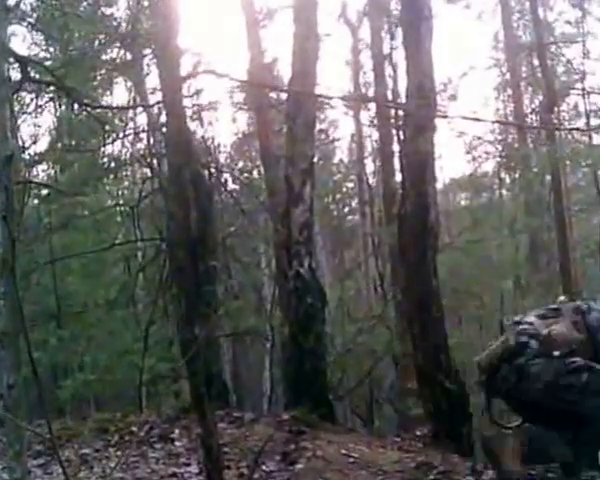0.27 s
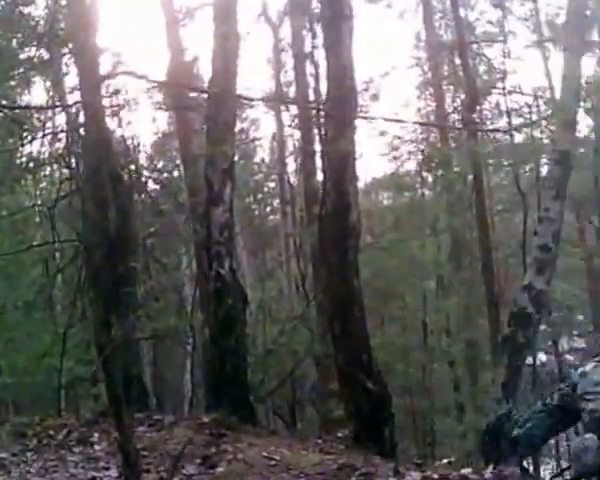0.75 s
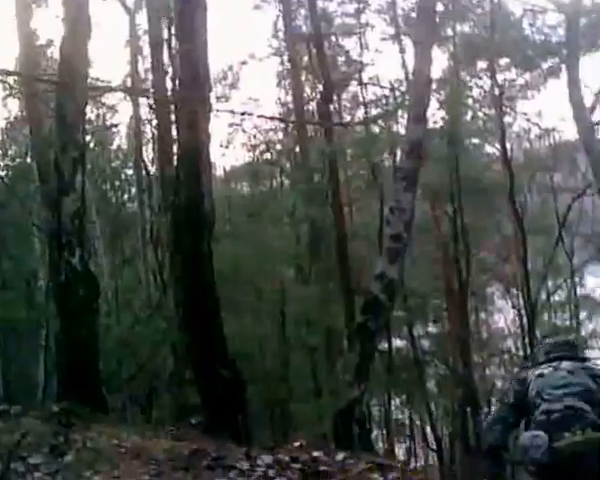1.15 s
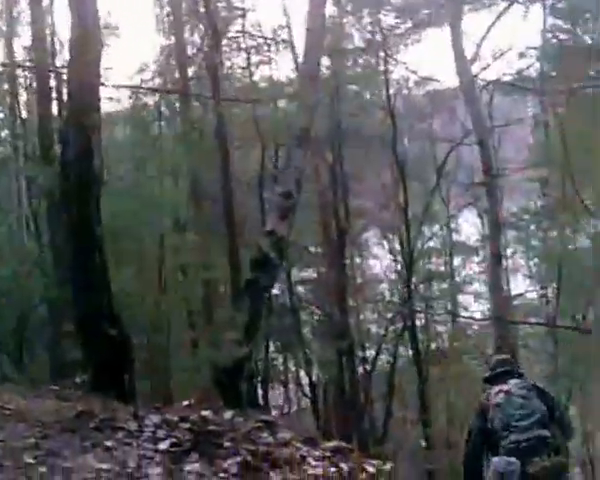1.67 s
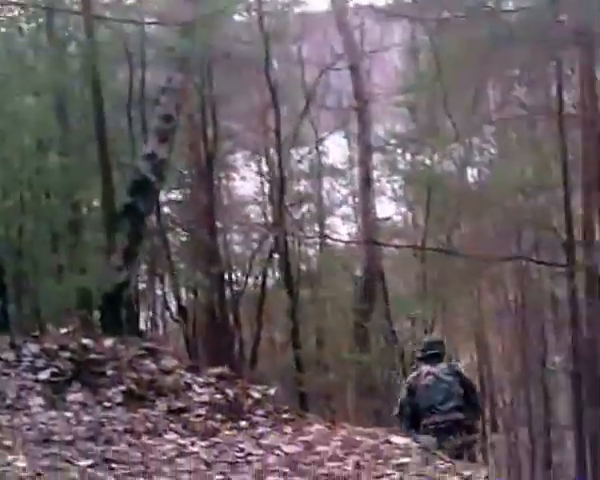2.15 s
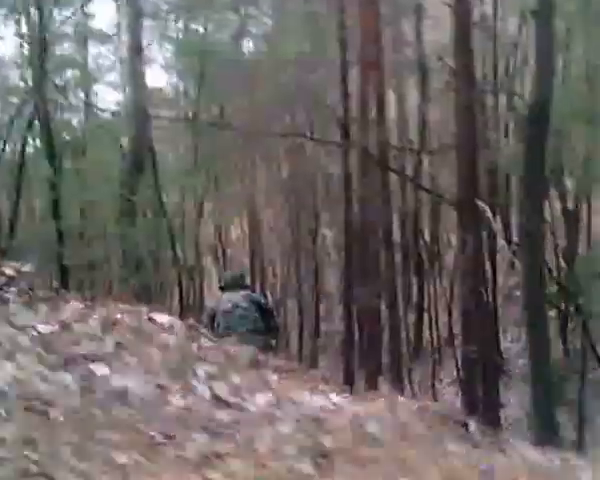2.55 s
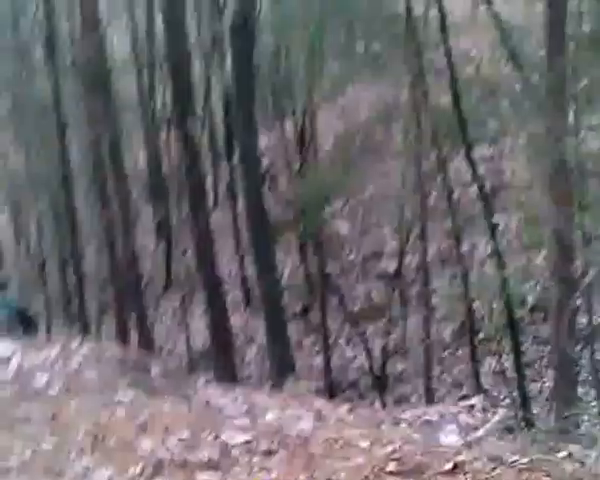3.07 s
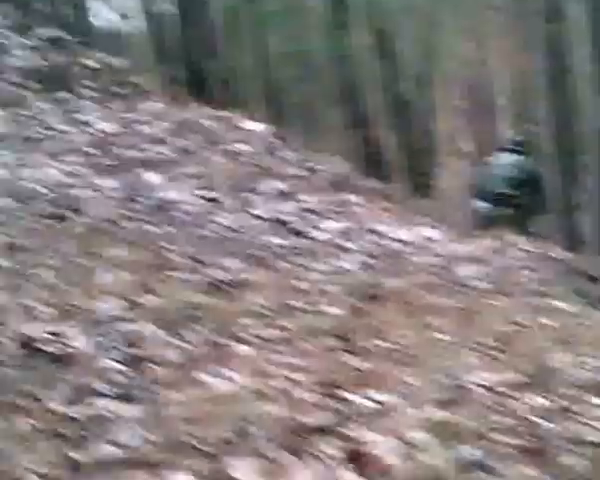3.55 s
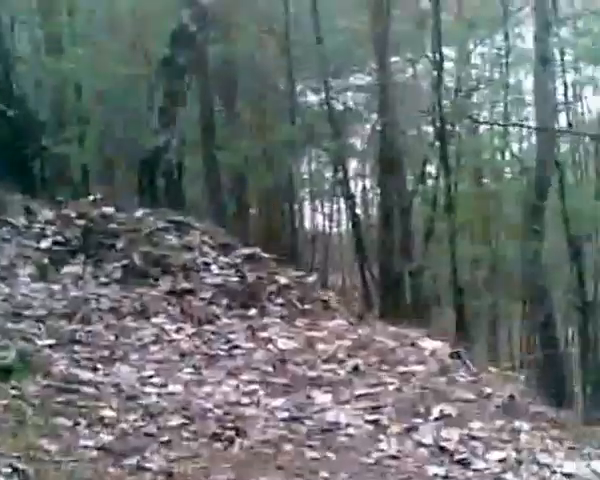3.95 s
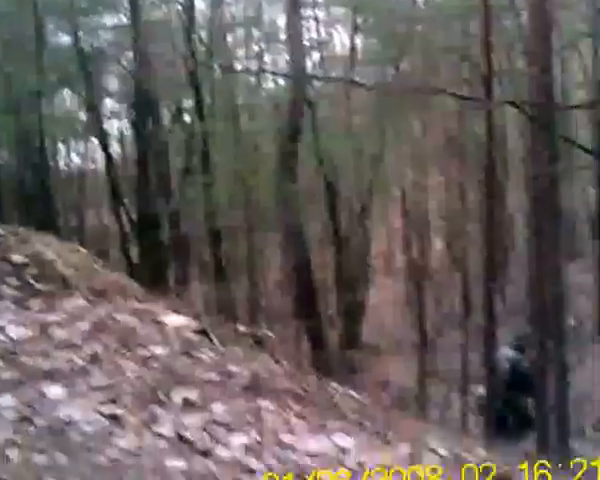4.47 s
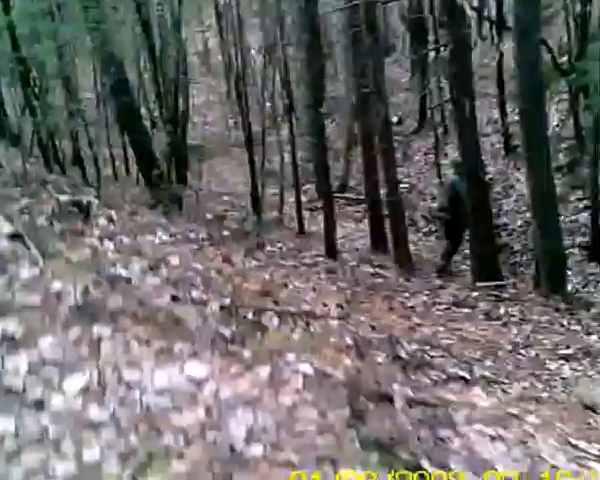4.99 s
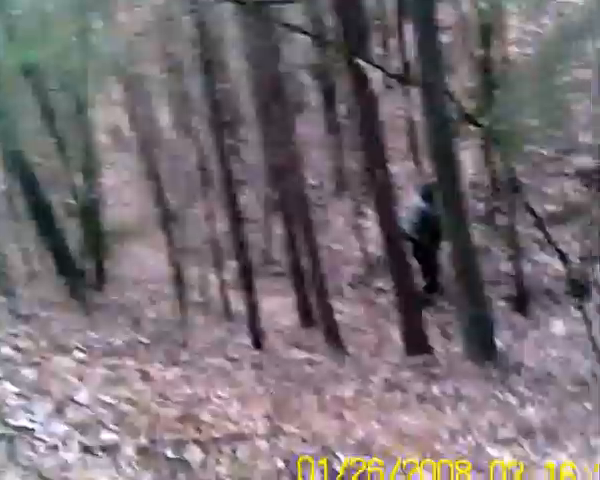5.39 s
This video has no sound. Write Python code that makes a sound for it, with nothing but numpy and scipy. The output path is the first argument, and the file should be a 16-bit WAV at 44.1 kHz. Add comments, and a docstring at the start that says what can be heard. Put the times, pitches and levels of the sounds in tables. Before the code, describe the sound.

A deep rumble of wind and handling sits on a small handheld microphone throughout, over soft forest air and a faint hiss. In the first second, light footsteps swish and crunch through dry leaves, with dull knocks from boots and hands. Between 1 and 2 seconds the walking is quieter and three small ticks sound; the second, at about 1.6 seconds, comes with a short rising plop. From about 2.1 seconds the rumble heaves louder and the steps become heavier and closer together, crackling and pressing down the leaf litter. Twigs snap now and then from 2.5 seconds, and often after 3.2. Gusts buffet the microphone hardest between 4.2 and 4.8 seconds. The strongest knock lands near 4.9, followed by the loudest crunch and a cluster of snaps around 5.1. The walking continues until about 5.6 seconds. The leaves and twigs have a slightly hollow, nasal ring.

```python
"""First comes a low rumble of wind and handling on a microphone, over soft forest air and stirring leaves.
Someone is carrying a small camera over dry leaves on a wooded slope. Each step breaks a swarm of leaf
edges, soles crunch dully into the leaf litter, boots and hands knock, and twigs snap. Three small ticks
and one plop sound early on. The microphone's hollow housing gives the leaves, litter, twigs and forest
air the same nasal ring, and the camera adds a faint hiss and whine."""
import sys
import numpy as np
from scipy import signal
from scipy.fft import rfft, irfft
from scipy.io import wavfile
from scipy.ndimage import uniform_filter1d

SR = 44100
rng = np.random.default_rng(int(sys.argv[2]) if len(sys.argv) > 2 else 0)


def bounce(signal):
    """Save signal as a 16-bit WAV file at the path given by the first command-line argument."""
    frames = np.transpose(np.atleast_2d(signal))
    limited = np.clip(frames, -1, 1)
    pcm = np.round(limited * 32767).astype(np.int16)
    wavfile.write(sys.argv[1], SR, pcm)


N = 247842
TIME = np.arange(N) / SR
FREQ = np.arange(N // 2 + 1) * SR / N

# Levels in the tables are relative: the functions below set how loud each sound ends up.
# The steady, deep rumble of air and hands on the microphone: time_s, level_db
BREEZE = [(0, -35.5), (0.7, -37), (1.45, -33), (1.75, -36), (2.5, -29), (3.4, -29), (5.62, -34)]
# Swings of the camera that make the rumble heave: start_s, hold_s, level_db
CAMERA_SWINGS = [(0.84, 0.071, -35), (2.043, 0.11, -31.5), (2.192, 0.057, -23), (2.614, 0.3, -27),
                 (2.968, 0.22, -29.5), (3.56, .26, -29), (4.032, 0.12, -26), (4.154, 0.038, -26),
                 (4.307, 0.21, -30), (4.548, 0.31, -25.5), (4.86, 0.17, -27), (5.24, 0.19, -30),
                 (5.552, .05, -27)]
# Gusts that hit the microphone: start_s, hold_s, level_db
WIND_GUSTS = [(2.153, .11, -35.5), (3.026, 0.023, -31), (3.693, 0.016, -33), (3.811, 0.029, -31),
              (4.226, 0.16, -30.5), (4.337, 0.047, -25), (4.448, 0.34, -27), (4.584, .03, -27),
              (4.878, 0.016, -32), (5.507, 0.088, -35.5)]
# The tone of big, slow swirls of air: frequency_hz, level_db
RUMBLE_TONE = [(4, 0.5), (15, 0), (30, 2), (42, -5.5), (58, -15), (90, -34.5), (300, -75)]
# The tone of small, fast swirls that buffet the microphone: frequency_hz, level_db
BUFFET_TONE = [(30, -14), (55, 1), (78, 0), (105, -4), (145, -11), (210, -21), (350, -34.5), (900, -60.5)]
# The tone of air in the trees: frequency_hz, level_db
FOREST_TONE = [(20, 7), (60, -10.5), (120, 0.5), (250, -6), (450, -7), (800, -15.5), (1500, -37),
               (3500, -43), (7000, -68), (15000, -71)]
# Pitches that the hollow microphone housing boosts or weakens: centre_hz, width_hz, boost_db
HOUSING_RESONANCES = [(1030, 390, -18.7), (1540, 640, 12.5), (1545, 170, 2.8), (2960, 270, -5.8),
                      (3400, 1020, 9.8), (4190, 370, 3.6), (6130, 430, 4.5), (7640, 820, 13.5),
                      (8400, 540, -8.7), (9110, 690, 8.4), (11000, 1720, -11.7), (12910, 680, 8.6),
                      (13660, 490, -8.1), (14430, 900, 13)]

# Leaves stirring between the steps: time_s, crunch_db
LEAF_STIR = [(0, -59.5), (.45, -56), (1.08, -58), (1.25, -52.5), (1.9, -53), (2.8, -51.5), (4.5, -51.5),
             (5.62, -50.5)]
# A foot pushes through the leaves (the offsets are added to crunch_db):
# start_s, hold_s, crunch_db, crackle_offset_db, slide_offset_db
FOOTSTEPS = [(0.139, 0.18, -52, -2.5, -7), (0.517, 0.23, -57, 3, -3.5), (0.874, 0.065, -60, 4.5, -5),
             (1.337, 0.1, -52, -9, -13), (2.1, 0.15, -51.5, -11, -15), (2.355, .22, -42.5, -2.5, -9),
             (2.405, 0.11, -49, -3, -3), (2.652, 0.036, -47.5, -4, -5.5), (2.779, 0.11, -47.5, -2.5, -9.5),
             (2.91, 0.065, -42.5, 0, -8), (3.108, 0.053, -52, 2, -4.5), (3.261, 0.024, -46.5, -4, -14),
             (3.4, 0.16, -45, -5.5, -12.5), (3.702, 0.16, -48.5, -4, -9.5), (3.843, 0.18, -47, -4.5, -8),
             (4.08, 0.18, -46, -11, -7.5), (4.316, 0.047, -58, -19, -6), (4.618, .13, -47.5, -9.5, -13),
             (4.778, 0.25, -41.5, -9.5, -20), (4.96, 0.076, -42.5, -8, -5.5),
             (5.06, 0.15, -38.5, -8.5, -12), (5.43, 0.018, -52.5, 0.5, -0.5), (5.52, .08, -49, -2, -4)]
# A toe skims the leaves with a short, bright swish: start_s, slide_db
TOE_SCUFFS = [(0.178, -52), (0.545, -50), (1.385, -57), (2.853, -64), (5.128, -58), (5.58, -54)]
# The tone of whole leaves crunching: frequency_hz, level_db
CRUNCH_TONE = [(400, -21.5), (800, 5), (1300, 2.5), (2200, -3), (2800, -8.5), (4000, -46)]
# The tone of leaf edges crackling: frequency_hz, level_db
CRACKLE_TONE = [(1500, -21.5), (2200, 2), (2700, 0.5), (4200, -2), (5200, -11), (7000, -17.5)]
# The hissing tone of leaves sliding: frequency_hz, level_db
SLIDE_TONE = [(3500, -39.5), (5000, 5.5), (5900, 6.5), (8000, 2), (11000, 1), (15500, -5.5)]
# A sole takes the weight and presses the leaf litter down: start_s, level_db
SOLE_PRESSES = [(0.32, -46.5), (0.365, -50.5), (0.63, -48), (0.745, -45), (0.83, -55), (1.17, -48.5),
                (1.39, -49), (1.745, -48), (2.05, -48), (2.135, -44), (2.22, -45), (2.39, -46),
                (2.601, -41.5), (2.77, -45), (2.86, -47.5), (2.955, -52), (3.305, -41.5), (3.42, -41.5),
                (3.495, -43), (3.54, -55), (3.67, -47.5), (3.92, -48), (4.03, -44.5), (4.17, -46),
                (4.454, -47.5), (4.665, -52), (5.0, -65), (5.113, -37), (5.18, -54), (5.24, -52),
                (5.556, -46)]
# The muffled tone of packed leaves and soil: frequency_hz, level_db
LITTER_TONE = [(100, -10.5), (200, -3.5), (330, -0.5), (500, -2.5), (750, -10.5), (1100, -12.5),
               (1700, -42.5)]

# Dull knocks of boots and hands: start_s, level_db, pitch_hz
DULL_KNOCKS = [(0.24, -26, 164), (0.373, -26.5, 161), (0.76, -28, 170), (0.899, -25.5, 184),
               (1.161, -31, 244), (1.443, -26.5, 288), (2.059, -26.5, 254), (2.228, -30, 542),
               (2.37, -30, 202), (2.611, -34, 386), (3.302, -25, 363), (3.331, -24, 186), (3.429, -28, 377),
               (3.829, -26, 149), (3.998, -32, 223), (4.913, -17, 162), (5.1313, -24, 620),
               (5.377, -22, 154)]
# Twigs and stiff leaves snapping: start_s, level_db, thinness (near -1 a thick twig, near 1 a leaf stalk)
TWIG_SNAPS = [(0.3341, -43, -0.68), (2.4946, -40, -.4), (2.7103, -45, 0.1), (2.863, -51.5, 0.94),
              (3.2474, -42.5, 0.098), (3.3358, -48, -1.1), (3.3762, -50, .5), (3.4013, -38.5, 0.19),
              (3.4309, -43, .2), (3.601, -41, -1.2), (3.6917, -41.5, 0.22), (3.9251, -38, -0.23),
              (3.967, -44, .2), (3.9949, -40, -.1), (4.0924, -40, 0.32), (4.1272, -42, 0.31),
              (4.1533, -53, -.5), (4.177, -41.5, .35), (4.3818, -45.5, 0.54), (4.4238, -43.5, 0.31),
              (4.493, -40, 0.035), (4.751, -42, -0.39), (4.8107, -36, -0.28), (4.8758, -41.5, 0.026),
              (5.008, -36, -0.86), (5.1144, -38.5, 0.62), (5.1306, -33.5, .35), (5.1484, -37.5, 0.46),
              (5.1702, -33.5, -0.32), (5.3753, -45, -0.85), (5.3846, -37.5, 0.18), (5.4767, -41.5, -0.071),
              (5.5498, -40.5, -0.32), (5.591, -44.5, 0.13)]
# The four parts of a snap, one row each for thud, wood, crackle and spit: offset_db, db_per_thinness
SNAP_PARTS = [(-14, 12), (0, -2), (-5.5, 4), (-19, 24.5)]
# The low thud of a snap: frequency_hz, level_db
THUD_TONE = [(200, -10), (400, -9), (750, -1), (1000, -11), (1500, -34)]
# The crack of the wood itself: frequency_hz, level_db
WOOD_TONE = [(900, -28), (1450, 7.5), (2100, 10), (2700, 5.5), (4000, -24.5)]
# The high spit of a thin stalk: frequency_hz, level_db
SPIT_TONE = [(3800, -27), (5200, 11), (7500, 0.5), (9500, -2), (12000, -18), (15500, -18)]
# Small, clean ticks: start_s, level_db, pitch_hz
SMALL_TICKS = [(1.121, -38, 2900), (1.5761, -28, 2780), (1.9743, -34, 3550)]
# One short, rising plop, together with the second tick: start_s, length_s, start_hz, end_hz, level_db
RISING_PLOP = (1.575, .033, 420, 515, -28.5)

# The tone of the camera's own hiss: frequency_hz, level_db
HISS_TONE = [(100, -4), (1000, 0), (3000, -2.5), (5000, -2), (9000, -3.5), (11000, -9.5), (13000, -6.5),
             (15500, -34)]
# The camera's faint whine: pitch_hz, level_db
CAMERA_WHINE = [(9600, -81), (12450, -84), (14337, -85)]


def undb(db):
    """Turn decibels into a gain, the number a sound is multiplied by."""
    return 10 ** (np.asarray(db) / 20)


def gain_curve(table):
    """Join (time_s, level_db) points into one gain for every sample."""
    times_s, levels_db = np.transpose(table)
    return undb(np.interp(TIME, times_s, levels_db))


def causal_filter(curve_db):
    """Turn a level per frequency into a filter that rings after a click, never before (minimum phase)."""
    cepstrum = irfft(curve_db * np.log(10) / 20, N)
    cepstrum[1:N // 2] *= 2
    cepstrum[N // 2 + 1:] = 0
    return np.exp(rfft(cepstrum))


def ring(sound, response):
    """Pass a sound through a filter."""
    return irfft(rfft(sound) * response, N)


def colour(sound, tone):
    """Shape a sound with a tone table of (frequency_hz, level_db) points."""
    hz, db = np.transpose(tone)
    curve_db = np.interp(np.log(FREQ + 1), np.log(hz), db)
    return ring(sound, causal_filter(curve_db))


def normalise(sound, band_hz):
    """Scale a sound so that its average strength (rms) between two frequencies is 1."""
    in_band = (FREQ > band_hz[0]) & (FREQ < band_hz[1])
    return sound / np.std(ring(sound, in_band))


def wander(rate_hz):
    """Glide from one random value to the next, mostly between -1 and 1."""
    span = max(int(SR / rate_hz), 1)
    held = np.repeat(rng.standard_normal(N // span + 1), span)
    return 1.2 * uniform_filter1d(held, span)[:N]


def steady(sound, seconds):
    """Even out the loudness over a given time; faster detail stays."""
    power = uniform_filter1d(sound ** 2, max(int(seconds * SR), 2))
    return sound / np.sqrt(np.abs(power) + 1e-12)


def grains(per_second, spread_db):
    """Tiny clicks at random times: many weak, a few strong."""
    hits = rng.random(N) < per_second / SR
    sizes = undb(spread_db * np.minimum(rng.exponential(size=N), 6))
    clicks = hits * sizes * rng.choice([-1, 1], N)
    return clicks / np.std(clicks)


def add(out, start_s, sound):
    """Mix a short sound in at its start time."""
    first = max(int(start_s * SR), 0)
    out[first:first + len(sound)] += sound[:max(N - first, 0)]


def swell(start_s, rise_s, hold_s, fade_s):
    """The gain of one movement: it rises, holds and dies away."""
    rise = np.clip((TIME - start_s) / rise_s, 0, 1)
    fading_for_s = np.maximum(TIME - start_s - rise_s - hold_s, 0)
    return rise * np.exp(-fading_for_s / fade_s)


def surges(base, table, rise_s, fade_s):
    """Add the power of (start_s, hold_s, level_db) swells to a background gain."""
    swells = (undb(db) * swell(start_s, rise_s, hold_s, fade_s) for start_s, hold_s, db in table)
    return np.sqrt(base ** 2 + sum(gain ** 2 for gain in swells))


def struck_tones(table, ring_s, trim_db):
    """Each (start_s, level_db, pitch_hz) blow rings one tone that falls by 60 dB in ring_s."""
    t, out = TIME[:SR // 8], np.zeros(N)
    for start_s, db, hz in table:
        fade = undb(db + trim_db - 60 * t / ring_s)
        add(out, start_s, fade * np.sin(2 * np.pi * hz * t))
    return out


def wind_gains(calm_rumble_db=-37, calm_buffet_db=-46, buffet_db_per_db=0.51):
    """Camera swings lift the rumble; the buffeting follows it and flares in each gust."""
    rumble = surges(gain_curve(BREEZE), CAMERA_SWINGS, rise_s=0.033, fade_s=0.051)
    swirls = undb(calm_buffet_db) * (rumble / undb(calm_rumble_db)) ** buffet_db_per_db
    return rumble, surges(swirls, WIND_GUSTS, rise_s=0.03, fade_s=0.022)


def wind(rumble_trim_db=-1.77, buffet_trim_db=-1.72):
    """Big, slow swirls of air push on the microphone; gusts add smaller, faster ones."""
    rumble_gain, buffet_gain = wind_gains()
    rumble = steady(colour(rng.standard_normal(N), RUMBLE_TONE), seconds=0.12)
    rumble = undb(rumble_trim_db) * normalise(rumble, band_hz=(20, 55))
    buffet = steady(colour(grains(per_second=900, spread_db=2.0), BUFFET_TONE), seconds=0.0557)
    buffet = undb(buffet_trim_db) * normalise(buffet, band_hz=(62, 180))
    return rumble_gain * rumble + buffet_gain * buffet


def microphone_housing():
    """The hollow housing boosts some pitches and weakens others: a filter with a nasal ring."""
    peaks_db = (db / (1 + (2 * (FREQ - hz) / width_hz) ** 2) for hz, width_hz, db in HOUSING_RESONANCES)
    return causal_filter(sum(peaks_db))


def forest_air(housing, level_db=-47, sway_db=1.2):
    """Air moves through the trees, growing a little louder and softer."""
    air = ring(colour(rng.standard_normal(N), FOREST_TONE), housing)
    return air / np.std(air) * undb(level_db + sway_db * wander(rate_hz=2.9))


def footwork(catch_db=1.26):
    """Gains of crunch, crackle and slide: steps and scuffs add to the stirring leaves."""
    stir_mix_db, scuff_mix_db = np.array([0, -4.5, -10.5]), np.array([-3, -0.5, 0])  # in that order
    power = np.outer(undb(stir_mix_db), gain_curve(LEAF_STIR)) ** 2
    for start_s, hold_s, db, crackle_offset_db, slide_offset_db in FOOTSTEPS:
        rise_s = 0.021 + 0.16 * hold_s  # a longer push also builds up for longer
        push = swell(start_s, rise_s, hold_s, fade_s=0.044)
        power += np.outer(undb([db, db + crackle_offset_db, db + slide_offset_db]), push) ** 2
    for start_s, db in TOE_SCUFFS:
        skim = swell(start_s, rise_s=0.0087, hold_s=0.01, fade_s=0.019)
        power += np.outer(undb(db + scuff_mix_db), skim) ** 2
    catch_and_slip = undb(catch_db * wander(rate_hz=45))
    return np.sqrt(power) * catch_and_slip


def leaves(housing, crunch, crackle, slide, cluster_db=1.0, dense_slide_db=-52, trim_db=-1.0):
    """Dry leaves break in clusters of tiny clicks; the strong breaks sound in all three layers at once."""
    clusters = undb(cluster_db * wander(rate_hz=130))
    drowning = np.sqrt(1 + (slide / undb(dense_slide_db)) ** 2)  # a dense slide hides the strong breaks
    strong_breaks = 0.71 * grains(per_second=1300, spread_db=3.5) / drowning
    layers = [(crunch, CRUNCH_TONE, 1.1, (1250, 2400)),
              (crackle, CRACKLE_TONE, 1.1, (2600, 5000)),
              (slide, SLIDE_TONE, 0.7, (5600, 15500))]
    out = np.zeros(N)
    for gain, tone, strong_share, band_hz in layers:
        fine_breaks = grains(per_second=12000, spread_db=2.0)
        swarm = steady(clusters * (strong_share * strong_breaks + fine_breaks), seconds=0.034)
        rustle = ring(colour(swarm, tone), housing)
        out += gain * normalise(rustle, band_hz)
    return out * undb(trim_db)


def leaf_litter(housing, crunch, step_db=-6.5, settle_db=-2.5, hold_s=0.012, trim_db=0.96):
    """Packed leaves and soil give way in muffled grains, most of all when a sole takes the weight."""
    giving_way = np.hypot(undb(step_db) * crunch, undb(settle_db) * gain_curve(LEAF_STIR))
    presses = [(start_s, hold_s, db) for start_s, db in SOLE_PRESSES]
    weight = surges(giving_way, presses, rise_s=0.0079, fade_s=0.039)
    muffled_grains = colour(grains(per_second=900, spread_db=2.0), LITTER_TONE)
    crush = steady(ring(muffled_grains, housing), seconds=0.054)
    return weight * undb(trim_db) * normalise(crush, band_hz=(250, 800))


def knocks(cutoff_hz=750):
    """Boots and hands knock; soft ground and skin blunt the start of each blow."""
    soften = signal.butter(3, cutoff_hz, fs=SR, output="sos")
    return signal.sosfilt(soften, struck_tones(DULL_KNOCKS, ring_s=0.039, trim_db=-2.5))


def twig_snaps(housing, splinter_size=0.34, splinter_chance=0.04, splinter_fade_s=0.0058):
    """A twig breaks with one crack and a quick spray of splinters; thick ones give a plain woody crack, thin
    ones add a low thud and a high spit."""
    t, out = TIME[:2048], np.zeros(N)
    click = signal.unit_impulse(N)
    parts = []
    for tone in (THUD_TONE, WOOD_TONE, CRACKLE_TONE, SPIT_TONE):
        part = ring(colour(click, tone), housing)[:len(t)]
        parts.append(part / np.sqrt(np.sum(part ** 2) / (0.004 * SR)))  # same energy for each part
    offset_db, db_per_thinness = np.transpose(SNAP_PARTS)
    for start_s, db, thinness in TWIG_SNAPS:
        crack = undb(db + offset_db + thinness * db_per_thinness) @ np.array(parts)
        splinters = rng.standard_normal(len(t)) * (rng.random(len(t)) < splinter_chance)
        force = splinter_size * splinters * np.exp(-t / splinter_fade_s)
        force[0] = 1  # the main break
        add(out, start_s, signal.fftconvolve(force, crack))
    return out


def ticks(lower_pitch_ratio=0.86, lower_offset_db=-1.5, band_hz=(1800, 4000)):
    """A small, hard part ticks with two close pitches and no bass."""
    lower_tones = [(start_s, db + lower_offset_db, hz * lower_pitch_ratio)
                   for start_s, db, hz in SMALL_TICKS]
    both_tones = struck_tones(list(SMALL_TICKS) + lower_tones, ring_s=0.0046, trim_db=-2)
    band_pass = signal.butter(2, band_hz, "bandpass", fs=SR, output="sos")
    return signal.sosfilt(band_pass, both_tones)


def plop():
    """A hollow little tone swells, rises in pitch and is gone."""
    start_s, length_s, start_hz, end_hz, db = RISING_PLOP
    progress, out = np.linspace(0, 1, int(length_s * SR)), np.zeros(N)
    pitch_hz = start_hz + (end_hz - start_hz) * progress
    phase = 2 * np.pi * np.cumsum(pitch_hz) / SR
    loudness = undb(db) * np.sin(np.pi * progress) * np.exp(-0.5 * progress)
    add(out, start_s, loudness * np.sin(phase))
    return out


def scene():
    """Leaves, litter, twigs and forest air ring in the housing; the other sounds arrive directly."""
    housing = microphone_housing()
    crunch, crackle, slide = footwork()
    rustle = leaves(housing, crunch, crackle, slide)
    walking = rustle + leaf_litter(housing, crunch) + knocks() + twig_snaps(housing)
    mix = wind() + forest_air(housing) + walking + ticks() + plop()
    return mix[None]  # one channel


def record(dry, hiss_db=-61, cutoff_hz=15750):
    """The camera adds its own hiss and whine and cuts off the highest treble."""
    hiss = colour(rng.standard_normal(N), HISS_TONE)
    hiss = undb(hiss_db) * hiss / np.std(hiss)
    whine = sum(np.sqrt(2) * undb(db) * np.sin(2 * np.pi * hz * TIME) for hz, db in CAMERA_WHINE)
    low_pass = signal.ellip(12, 0.2, 70, cutoff_hz, fs=SR, output="sos")
    return signal.sosfilt(low_pass, dry + hiss + whine)


dry = scene()
out = record(dry)
bounce(out)
```